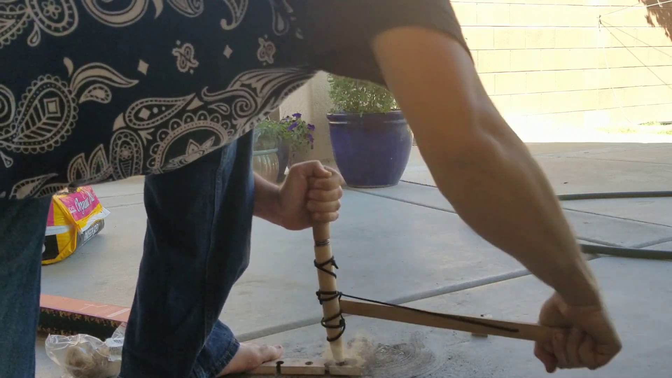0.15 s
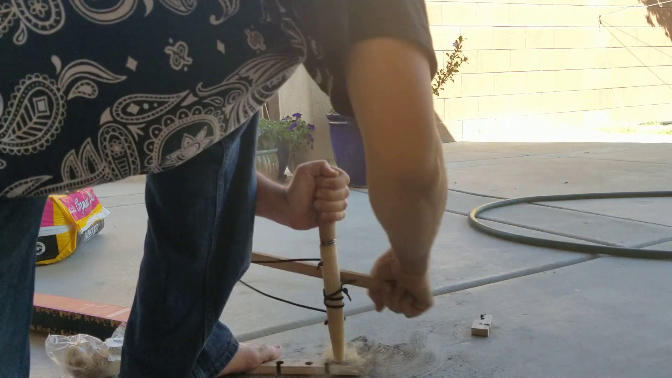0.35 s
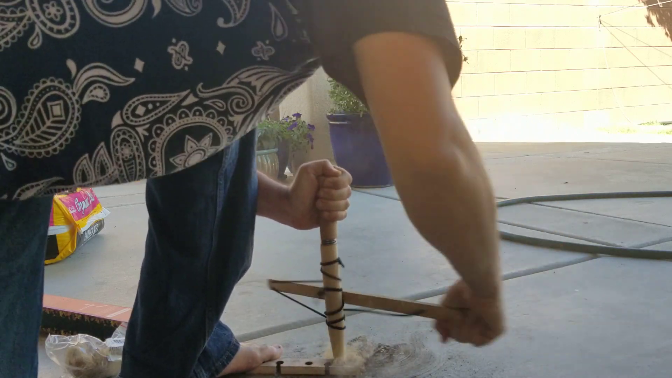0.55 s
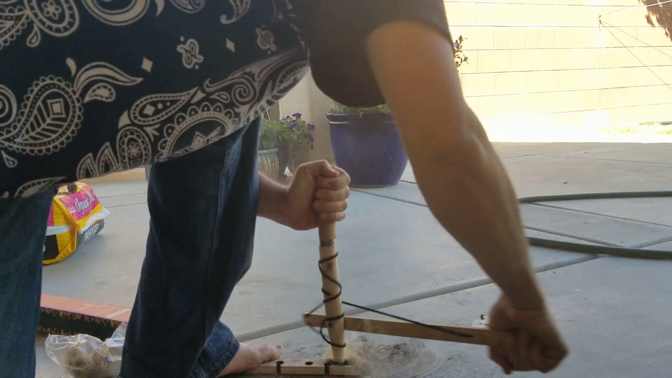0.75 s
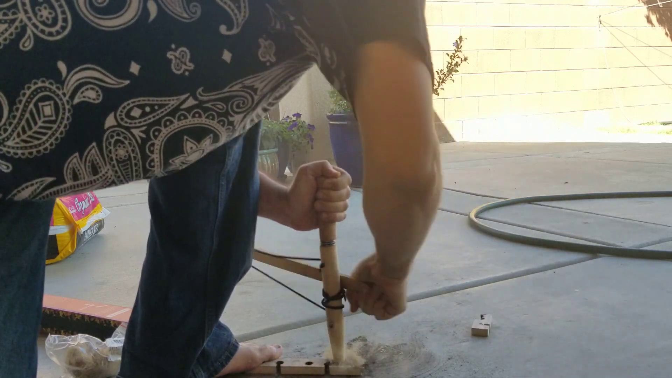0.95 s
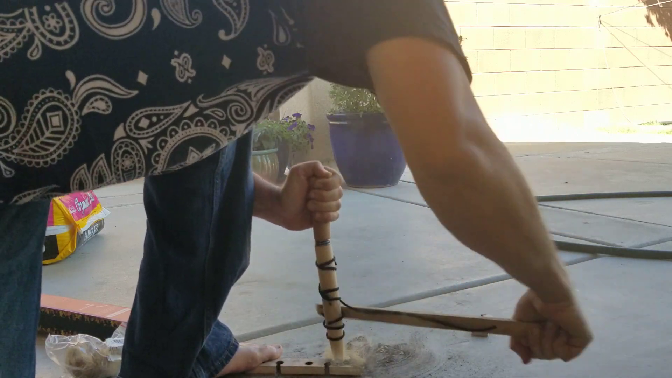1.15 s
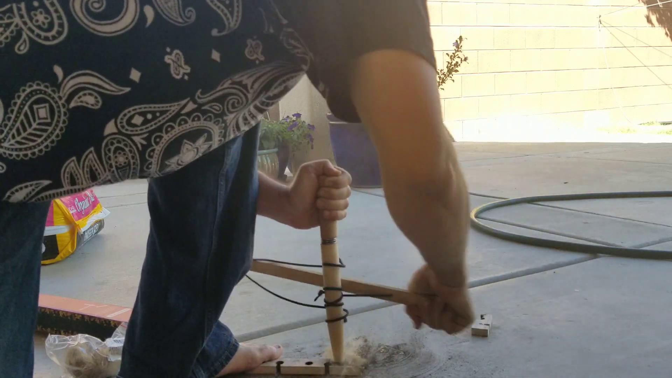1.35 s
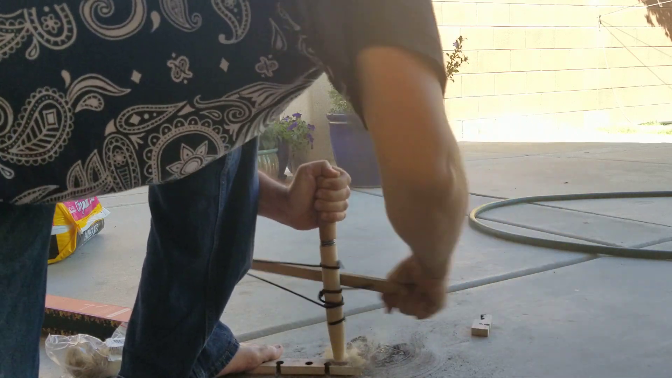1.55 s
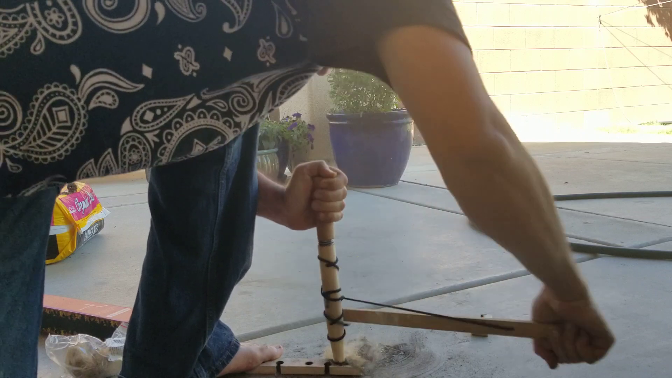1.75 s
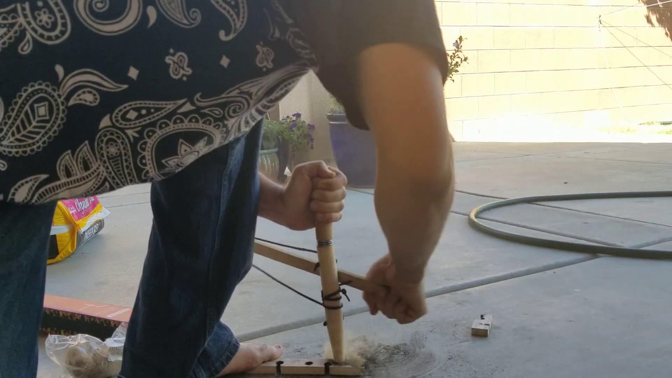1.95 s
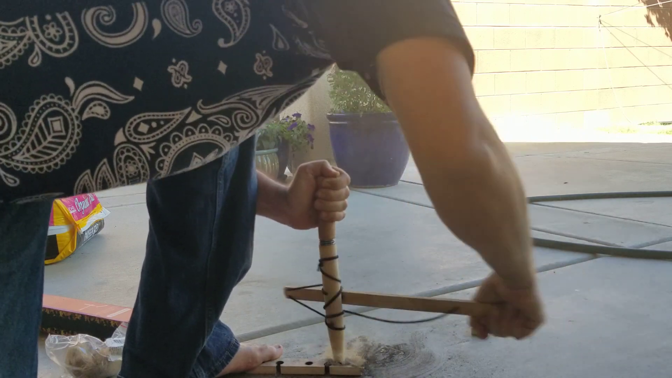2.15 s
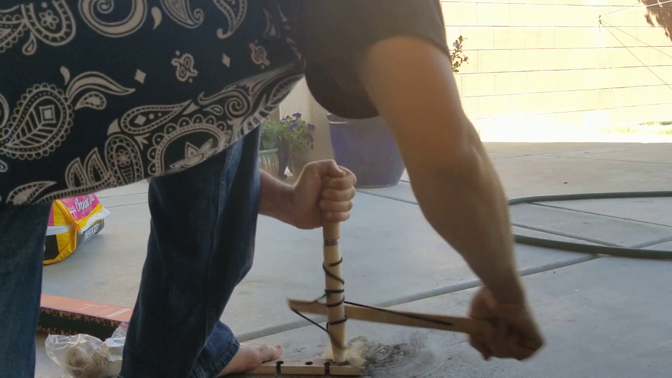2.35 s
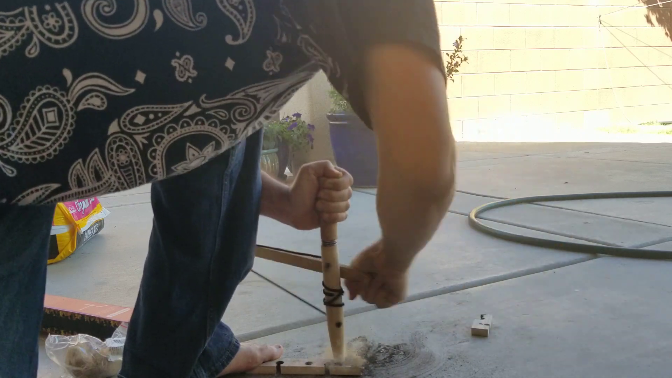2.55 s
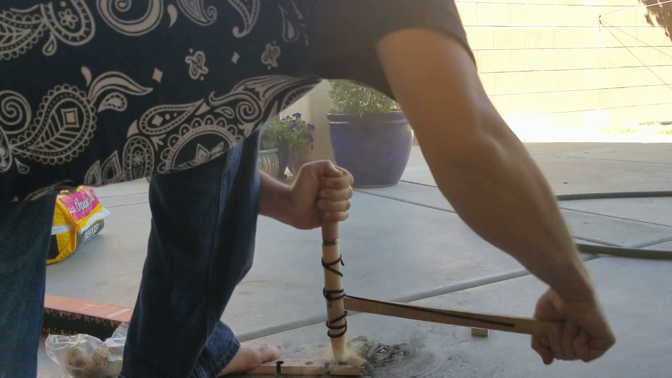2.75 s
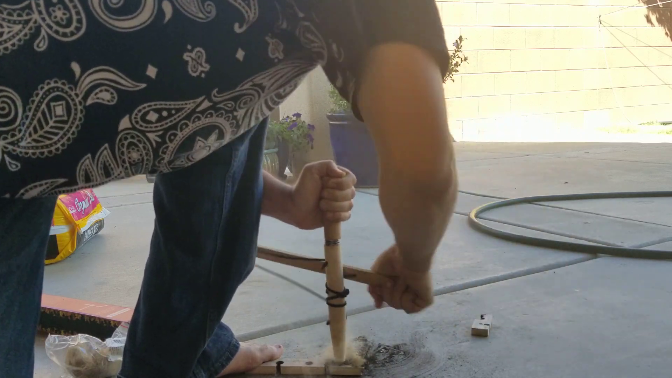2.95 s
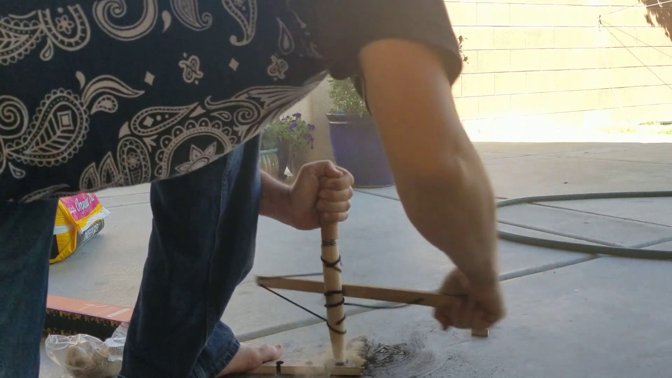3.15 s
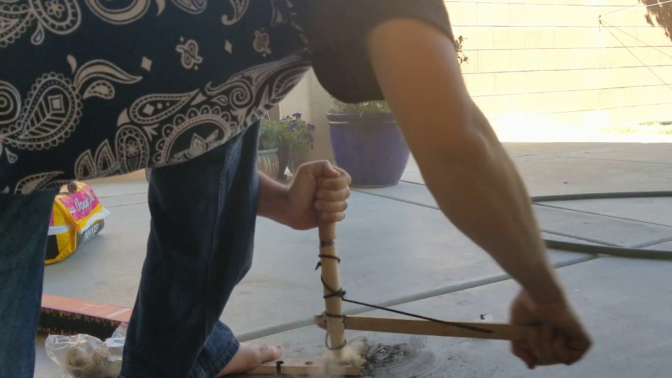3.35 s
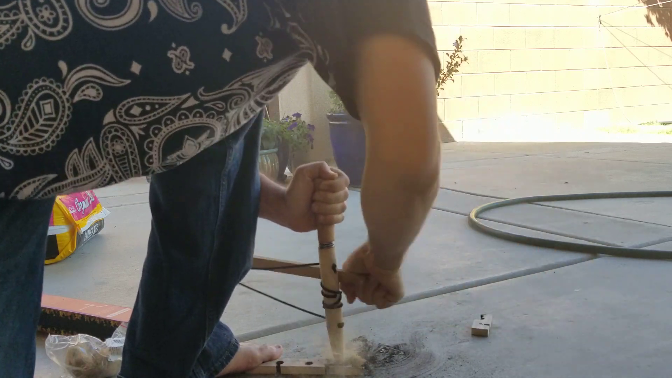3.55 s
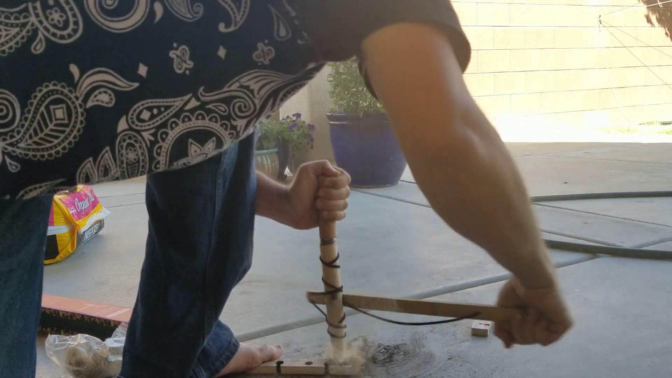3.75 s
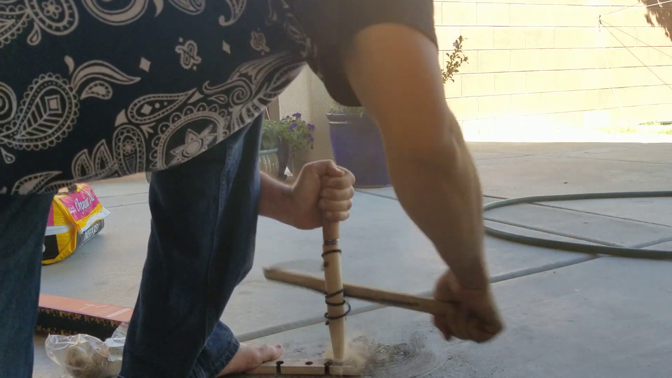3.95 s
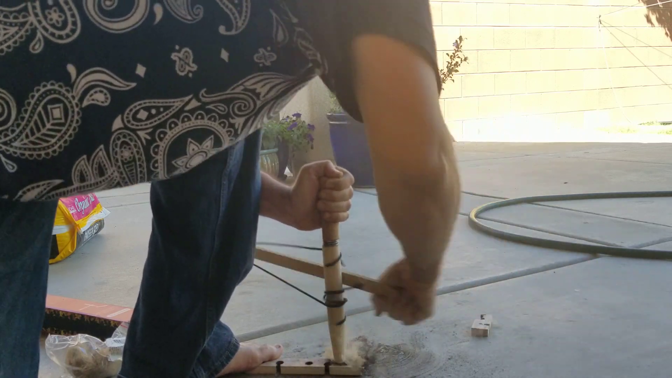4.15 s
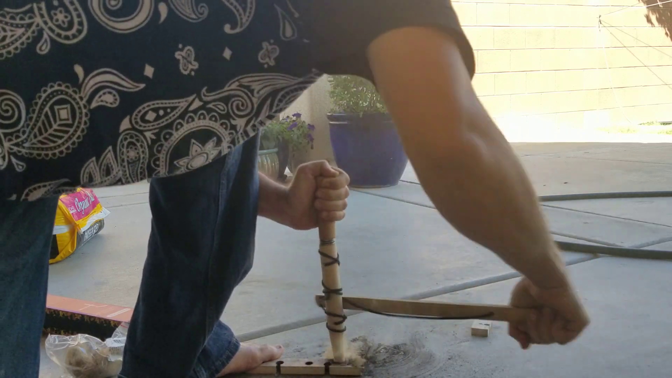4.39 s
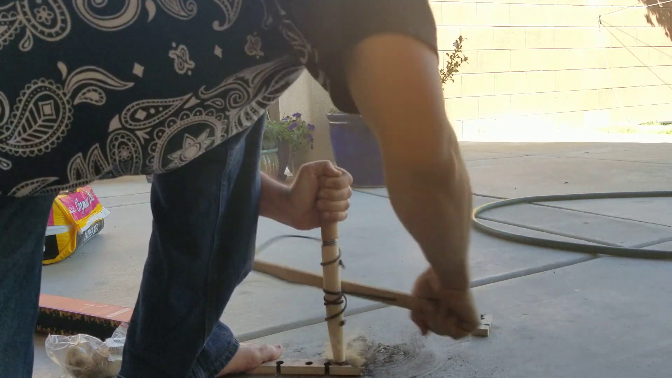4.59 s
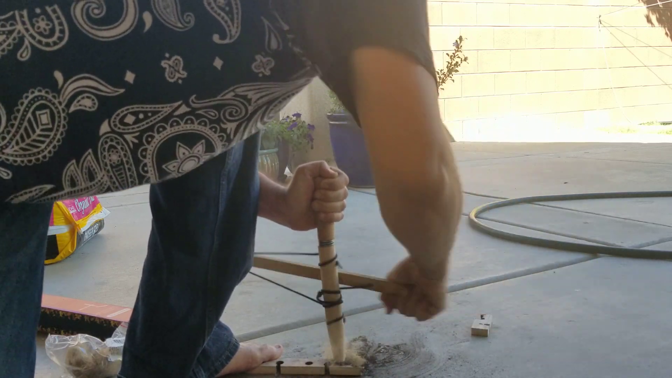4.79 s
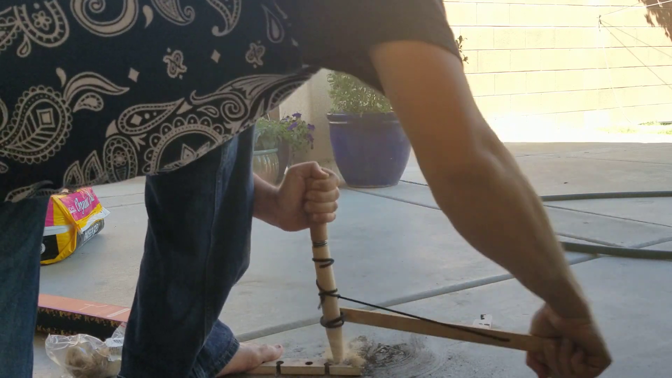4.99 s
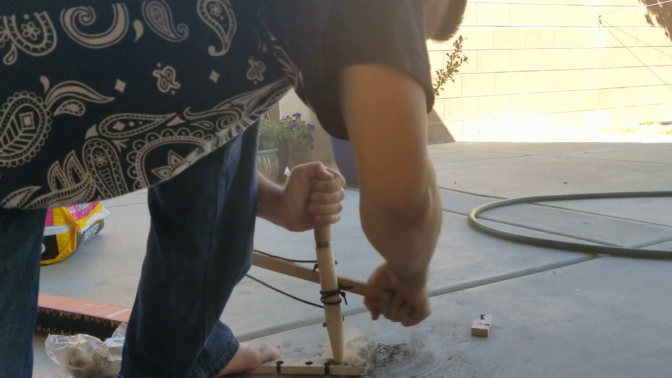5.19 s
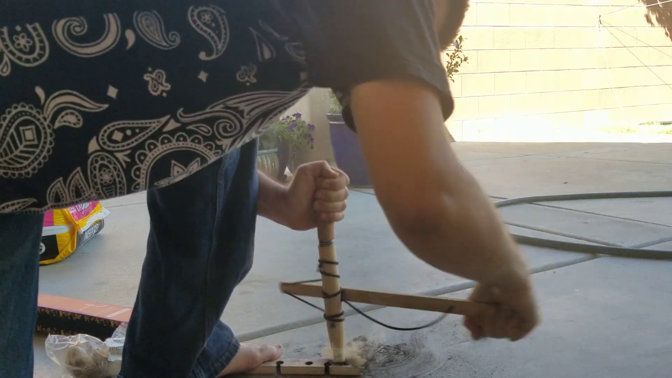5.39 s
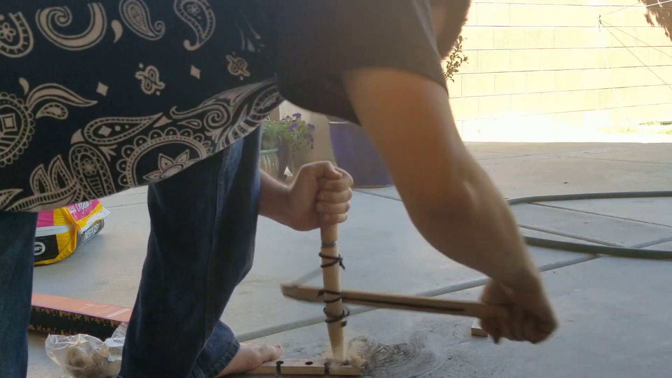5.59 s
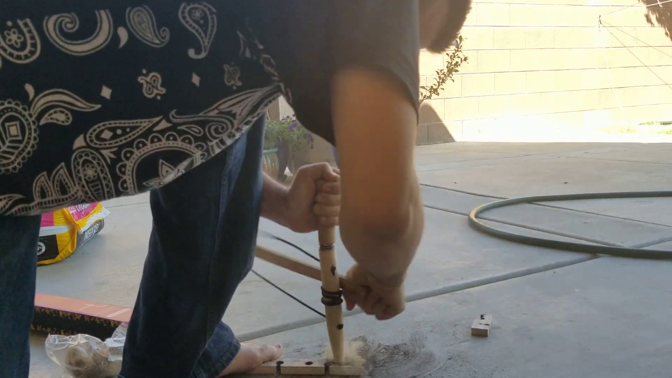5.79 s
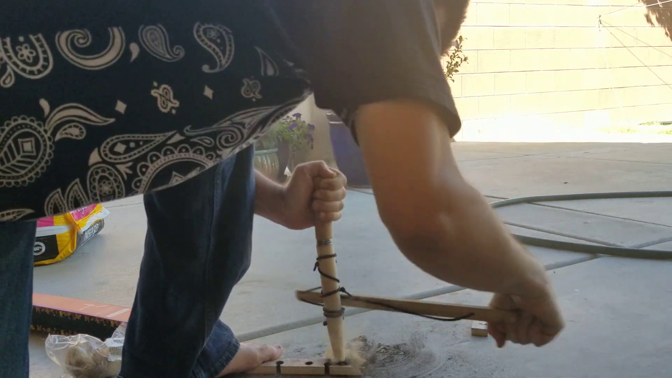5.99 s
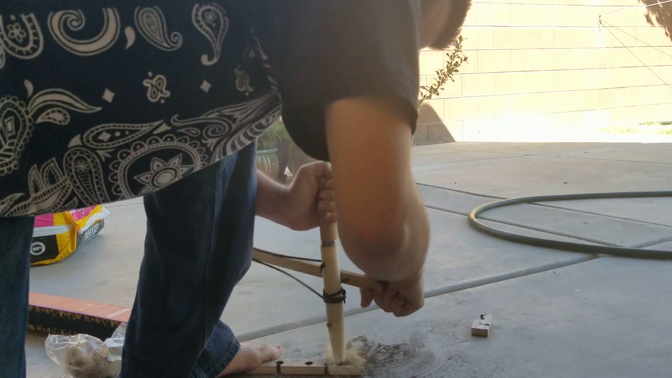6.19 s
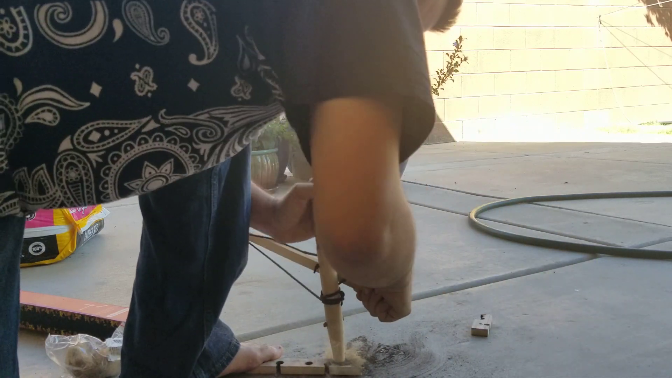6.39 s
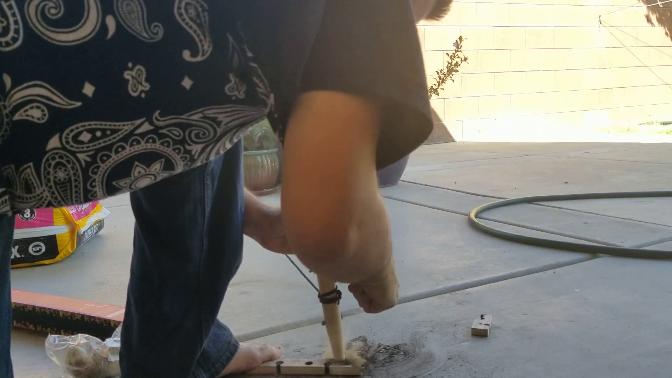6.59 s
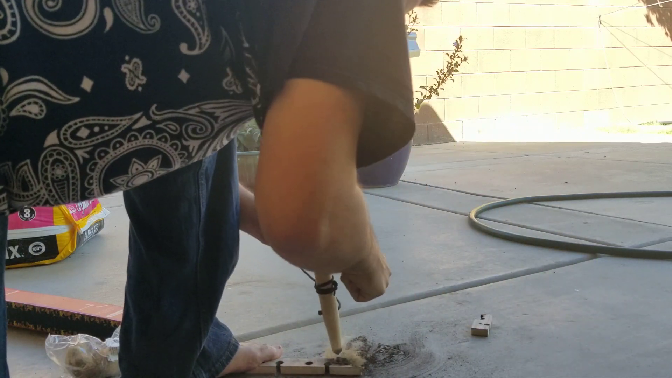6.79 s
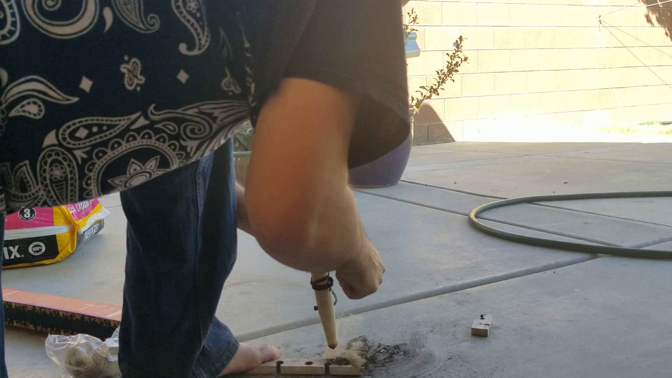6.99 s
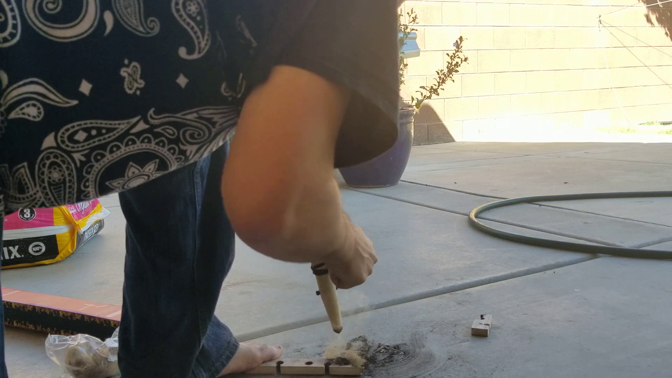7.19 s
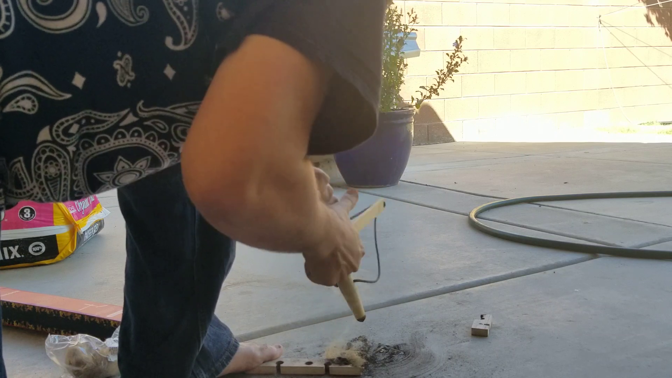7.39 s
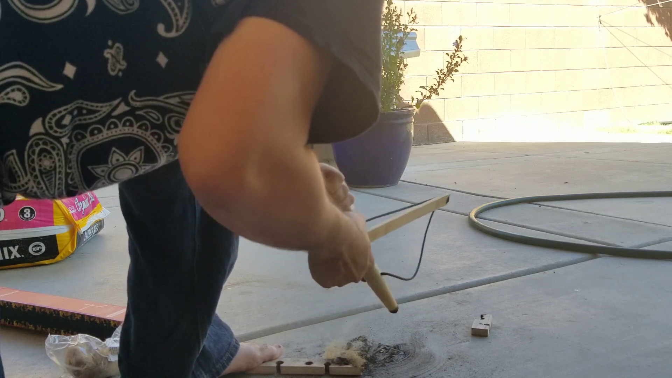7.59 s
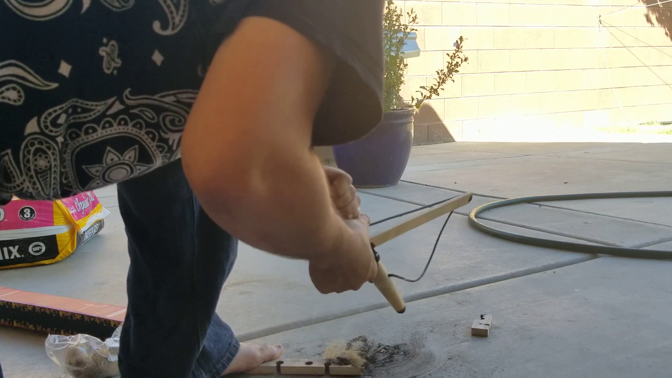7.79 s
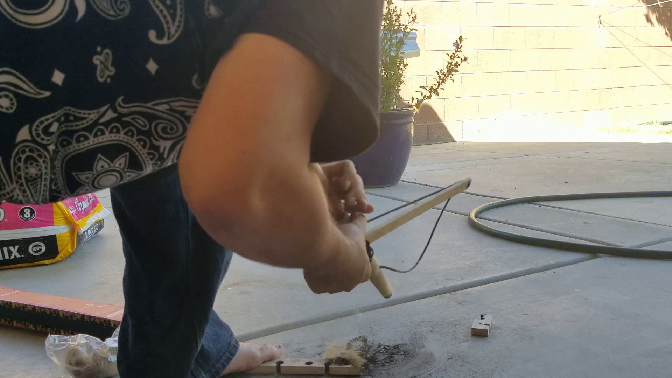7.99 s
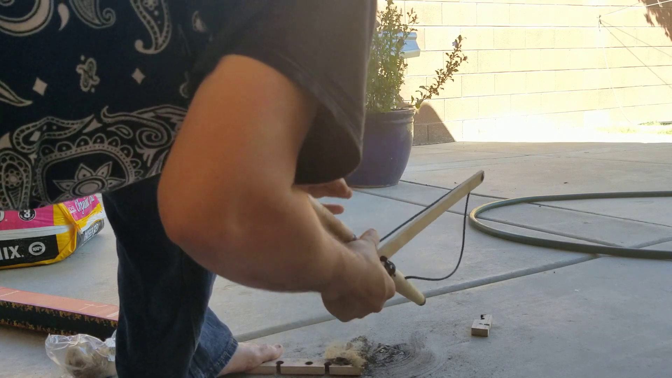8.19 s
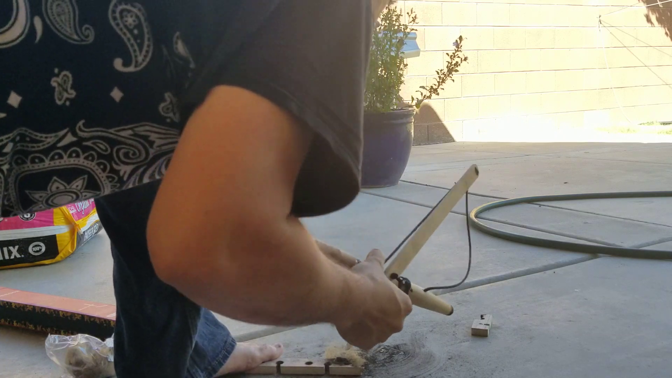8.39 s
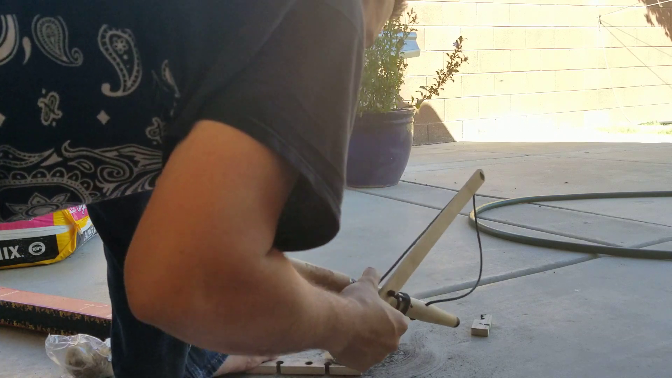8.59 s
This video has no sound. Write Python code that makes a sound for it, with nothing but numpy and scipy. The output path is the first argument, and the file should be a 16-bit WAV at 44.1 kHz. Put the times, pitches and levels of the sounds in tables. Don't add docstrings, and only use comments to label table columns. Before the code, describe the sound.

Fast rasping strokes of a wooden spindle on a board, with snapping cord and knocking bow, stop; then quiet patio, soft coo and falling bird whistles.

```python
import sys
import numpy as np
from scipy import signal
from scipy.fft import rfft, irfft, next_fast_len
from scipy.io import wavfile
from scipy.ndimage import uniform_filter1d

SR = 44100
rng = np.random.default_rng(int(sys.argv[2]) if len(sys.argv) > 2 else 0)


def boost(x):
    u = np.asarray(x, float) / 20
    return 10 ** u


def transcribe(u):
    v = np.clip(np.atleast_2d(u).T, -1, 1)
    q = np.round(v * 32767).astype(np.int16)
    wavfile.write(sys.argv[1], SR, q)


N = 381024


def level(x, db):
    return x * boost(db) / np.sqrt(np.mean(x ** 2))


def curves(table, outside):
    s, *columns = np.transpose(table)
    return [np.interp(np.arange(N) / SR, s, c, outside, outside) for c in columns]


def band(x, lo_hz, hi_hz, order=3):
    return signal.sosfilt(signal.butter(order, [lo_hz, hi_hz], "bandpass", fs=SR, output="sos"), x)


def response(points, modes=()):
    hz = np.arange(2049) * SR / 4096 + 1
    point_hz, point_db = np.transpose(points)
    db = np.interp(np.log(hz), np.log(point_hz), point_db)
    db = db + sum(mode_db / (1 + (2 * (hz - mode_hz) / width) ** 2) for mode_hz, width, mode_db in modes)
    cep = irfft(np.log(boost(db)))
    cep[1:2048] *= 2
    cep[2049:] = 0
    return irfft(np.exp(rfft(cep)))[:2048]


def walk(rate):
    k = int(SR / rate)
    held = np.repeat(rng.standard_normal(N // k + 1), k)
    return 0.9 * uniform_filter1d(held, k)[:N]


def pair(x, alike):
    side = x * rng.choice([-1, 1], size=N)
    return np.array([x, alike * x + np.sqrt(1 - alike ** 2) * side])


def sides(left_db, right_db):
    return boost(np.array([[left_db], [right_db]]))


# (time of top speed [s], rasp level [dB], speeding up [s], slowing down [s])
PULLS = [(0., -38, 0.073, 0.075), (0.307, -32.5, 0.14, 0.13), (0.626, -34.5, 0.13, 0.15),
         (0.956, -32.5, 0.083, 0.12), (1.266, -35.5, 0.095, 0.14), (1.573, -33, 0.076, 0.19),
         (1.927, -31, 0.11, 0.091), (2.227, -28, 0.095, 0.15), (2.555, -29.5, 0.13, 0.17),
         (2.881, -28.5, 0.053, .16), (3.205, -31.5, 0.068, 0.17), (3.521, -28, 0.091, 0.15),
         (3.796, -34, 0.011, 0.27), (4.175, -31.5, 0.11, 0.15), (4.494, -30, 0.073, 0.1),
         (4.808, -32, 0.15, 0.14), (5.153, -33, 0.16, 0.16), (5.454, -29.5, 0.055, 0.17),
         (5.758, -30, 0.055, 0.16), (6.055, -33.5, 0.036, 0.25)]
# (time of top speed [s], rasp level [dB], slowing down [s])
PUSHES = [(0.137, -37.5, 0.13), (0.456, -39.5, 0.21), (0.796, -38.5, 0.19), (1.112, -39.5, 0.47),
          (1.437, -38, 0.1), (1.752, -38, 0.18), (2.066, -38, 0.16), (2.394, -36.5, 0.15),
          (2.709, -37, 0.22), (2.8, -39.5, 0.28), (3.046, -38, 0.14), (3.367, -35.5, 0.12),
          (3.687, -36, 0.15), (4.012, -34.5, 0.13), (4.33, -37, 0.41), (4.653, -37.5, 0.12),
          (4.985, -36, 0.13), (5.299, -39, 0.19), (5.624, -37.5, 0.16), (5.92, -38.5, 0.18),
          (6.28, -55, 0.16)]
PULL_KNOCKS = [-13, -12, -10.5, -12, -10, -13.5, -14, -14.5, -14.5, -15, -10.5, -14.5, -17.5, -12, -12,
               -13.5, -13, -12.5, -11, -11]
PUSH_KNOCKS = [-13.5, -12.5, -11.5, -13, -11.5, -11.5, -10.5, -11, -11.5, -13.5, -13, -12, -12.5, -13, -15,
               -11.5, -12, -14.5, -14, -13.5, -7.5]


def strokes():
    pull_dust_db, push_dust_db, push_rise_s = -5.5, -7, 0.14
    settling_db_per_s = -0.25
    rows = [(s, db, rise, fall, knock, pull_dust_db)
            for (s, db, rise, fall), knock in zip(PULLS, PULL_KNOCKS)]
    rows += [(s, db, push_rise_s, fall, knock, push_dust_db)
             for (s, db, fall), knock in zip(PUSHES, PUSH_KNOCKS)]
    return [(*row[:5], row[5] + settling_db_per_s * (row[0] - 3)) for row in rows]


def returning():
    turns = [(row[0], 0) for row in PULLS] + [(row[0], 1) for row in PUSHES]
    s, back = np.transpose(sorted(turns))
    return np.interp(np.arange(N) / SR, s, back) ** 2


def grains(spread_db, share):
    tall_db = np.minimum(spread_db * rng.exponential(size=N), 17)
    spikes = rng.standard_normal(N)
    tall = rng.random(N) < share
    return level(spikes * boost(tall_db * tall), 0)


# (time of release [s], change of level [dB], slowing [s])
STALLS = [(.543, -9, 0.06), (.87, -8.5, 0.046), (1.2, -5.5, 0.039), (1.523, -0.5, 0.05), (2.16, -2, 0.034),
          (2.478, -6.5, 0.028), (2.808, -11, 0.026), (3.01, -1.5, 0.033), (3.33, -3.5, 0.047),
          (3.78, -1.5, .04), (4.412, -9.5, 0.026), (4.745, -7.5, 0.034), (5.079, -4, 0.026),
          (5.4, 0.5, 0.023), (5.707, 1.5, .02), (6.022, 0.5, 0.022)]


def grinding():
    t, power = np.arange(N) / SR, np.zeros((4, N))
    for s, db, rise, fall, knock, dust in strokes():
        span = slice(max(int((s - rise) * SR), 0), int((s + fall) * SR))
        speed = np.interp(t[span], [s - rise, s, s + fall], [0, 1, 0])
        makeup = [(knock, 1.9), (-3.2, 2.1), (1.08 * dust - 1.5, 2.2), (dust, 2.3)]
        for k, (rel_db, steep) in enumerate(makeup):
            power[k, span] += (boost(db + rel_db) * speed ** steep) ** 2
    for s, db, slowing in STALLS:
        stall_db = np.interp(t, [s - slowing, s - slowing / 2, s, s + .001], [0, db, db, 0])
        power *= boost(2 * stall_db)

    coarse, fine = grains(4.6, .04), grains(4.2, 0.07)
    tear = [0.59 * coarse + .8 * fine, coarse, 0.74 * coarse + 0.8 * fine, fine]
    flutter_db = 1.9 * walk(70) + 2.9 * walk(220)
    alike, lean_db = [.88, 0.47, 0.29, 0.031], [4.8, 1.4, 11.7, 3.8]
    rubs = []
    for grain, drive, same, lean in zip(tear, power, alike, lean_db):
        rub = pair(grain, same) * np.sqrt(drive)
        wobble_db = flutter_db + 1.67 * walk(45) + 1.56 * walk(16)
        rubs.append(rub * boost(wobble_db) * sides(lean / 2, -lean / 2))
    return rubs


# (time [s], tick level [dB], crack against the tick [dB])
TICKS = [(0.1588, -35.5, -4), (0.2912, -26, -4.5), (0.435, -24.5, -7.5), (0.612, -26, -4),
         (0.7586, -20.5, -8.5), (0.9535, -25, -4.5), (1.095, -26.5, -6), (1.408, -22.5, -5),
         (1.584, -25.5, -9), (1.7396, -35, -15), (1.8744, -30, -4), (1.9157, -22, -5), (2.042, -23, -6),
         (2.048, -26.5, -6), (2.3743, -22.5, -3.5), (2.4863, -31.5, -17), (2.532, -31.5, -10),
         (3.039, -36.5, -8), (3.1846, -22, -14), (3.359, -30.5, -6.5), (3.488, -28.5, -7),
         (3.528, -25, -20), (3.821, -27, -8.5), (4.135, -28.5, -5.5), (4.4237, -32.5, -7.5),
         (4.456, -34.5, -3.5), (4.7485, -30.5, -11), (5.429, -41, -2), (5.4376, -30, 0),
         (5.6327, -27, -1.5)]
# (time [s], body level [dB], crack against body [dB], knock against body [dB])
BLOWS = [(.31, -36.5, 3, -3), (.544, -43, 0, -20), (0.6301, -33.5, -0.5, -8.5), (0.7934, -29, 8.5, -16.5),
         (0.937, -33.5, 1.5, -7.5), (0.9707, -34.5, 2, -7.5), (1.525, -26, -2, -24),
         (1.5405, -39, -19.5, -28), (1.573, -46.5, -0.5, -11), (1.9295, -31, 5, -10),
         (2.1641, -35, 1.5, -27), (2.2114, -29.5, 0, -11.5), (2.5398, -31.5, -0.5, -11.5),
         (2.699, -43.5, -3.5, -20), (2.7659, -38, -3, -14.5), (2.867, -25, 1, -15), (3.195, -31, -2.5, -13),
         (3.5128, -31, 7, -12), (3.781, -24, -1, -24), (3.798, -38.5, -12, -20.5),
         (3.828, -27.5, 3.5, -13.5), (3.8467, -29.5, 1.5, -14), (4.157, -30, -13, -9.5),
         (4.4725, -31, -2, -10), (4.489, -39, 8, -22), (4.7914, -28.5, 0, -11.5),
         (5.1344, -26.5, -1, -10.5), (5.445, -22, 3, -15), (5.7517, -25.5, 0.5, -17.5),
         (6.037, -31, -9.5, -13)]
# (time [s], crack level [dB], tick against the crack [dB])
SPLINTERS = [(0.1056, -46, 5.5), (0.2735, -41, 1.5), (0.904, -38.5, 5), (1.204, -36, -1),
             (1.2639, -29.5, 1.5), (1.8983, -32.5, 1), (2.0838, -36.5, -14), (2.4795, -38.5, 3),
             (2.544, -44, -14.5), (2.7072, -34.5, 2), (2.8174, -37.5, 4), (2.8745, -40, 2),
             (2.9278, -37, -2), (3.165, -36.5, -2.5), (3.21, -26.5, -2.5), (3.4518, -40.5, 0),
             (3.671, -37, 0.5), (3.676, -36, 1), (4.004, -37.5, 2), (4.0974, -40.5, 1), (4.352, -32, -3.5),
             (4.636, -34.5, -1.5), (4.694, -41, 5), (4.967, -37, -5), (5.284, -40, -1), (5.403, -34.5, -2),
             (5.455, -36, 4.5), (5.7083, -37.5, 0), (5.736, -40, 0.5), (6.0774, -33, -4.5)]
# (time [s], peak level [dB], tick against peak [dB],
# body against peak [dB])
CHIPS = [(0.081, -49, 3, -5), (0.143, -39.5, 3.5, -6), (0.216, -46.5, 4.5, 1), (0.284, -39.5, -4.5, -7),
         (0.552, -40, 6, -5), (0.564, -40, 1.5, -1.5), (0.602, -35.5, -1, -3), (0.708, -45, -1.5, -4.5),
         (0.739, -50, -6.5, 6), (0.8702, -43.5, 4, 3), (0.882, -38.5, 4, -3), (0.896, -44, 0, 4),
         (0.915, -38, 6, -12), (1.089, -41, 4, -9), (1.2443, -33, -0.5, -6), (1.3, -36, -10, -1),
         (1.4462, -37, -2.5, -0.5), (1.602, -31.5, -3, -2.5), (1.645, -39, 1.5, -7),
         (1.8459, -39.5, 1.5, -2), (2.2285, -30, 0.5, -6.5), (2.676, -50, -1, -4), (2.7469, -36.5, 1.5, -4),
         (2.8084, -50, 4, 4), (3.2228, -27, -9, 0), (3.3066, -41, -2.5, -1), (3.3877, -36, 1, -5.5),
         (3.4986, -35, -2, 0), (3.642, -41.5, -2, -2), (3.8114, -38, 3.5, -10), (3.8619, -34, 4.5, 4.5),
         (3.9906, -37.5, -2, -9), (4.0262, -38.5, -7, -14.5), (4.1255, -40.5, 5, 4), (4.19, -33, -1, 3.5),
         (4.2717, -42, -5, -1), (4.321, -37.5, 4.5, -7), (4.4134, -42, -0.5, -1),
         (4.6731, -33.5, -4.5, -7.5), (4.8364, -32, -1, 0), (4.987, -35.5, 0, -8), (5.0826, -44.5, 6, 2.5),
         (5.1437, -32, -6, -15), (5.3306, -36.5, -6, -6.5), (5.4114, -40.5, -5, -5), (5.493, -36, -6, 3),
         (5.594, -39.5, 1, -2), (5.6002, -38.5, 0, -1),
         (5.723, -37, 3.5, -1),
    (5.78, -30.5, 2, -1),
    (5.8077, -37.5, -4.5, 3.5),
    (5.861, -39.5, -2, -1),
    (5.911, -40, 2.5, -9),
    (6.024, -51, 3, 3),
    (6.0654, -38, -4.5, 1.5),
    (6.1121, -33, -2.5, -3),
    (6.1324, -42, 0, -8),
]


def snap_rows():
    rows = [(s, db - 33, db - 26.5, db + crack, db, 7.5, 1) for s, db, crack in TICKS]
    rows += [(s, db + knock, db, db + crack, db + crack - 6, 4, 1) for s, db, crack, knock in BLOWS]
    rows += [(s, db - 19, db - 10, db, db + tick, 6, 1.8) for s, db, tick in SPLINTERS]
    rows += [(s, db - 21, db + body - 4.5, db - 3, db + tick - 2, 4, 2.18)
             for s, db, tick, body in CHIPS]
    return rows


# (swell [ms], fade [ms], blow level [dB], rattle level [dB], settling level [dB], gain [dB])
SNAP_SHAPE = [(.1, 0.73, 5.5, -19.5, -23.5, 27.5), (.1, 0.6, 16.5, -13, -16, 25.5),
              (.3, 0.5, 8.5, -14.5, -25.5, 23), (0.45, 0.28, 2, -24, -37, 24)]


def snaps():
    out = np.zeros((4, 2, N + 4096))
    ms = np.arange(4096) * 1000 / SR
    blow = np.arange(len(ms)) == np.array([[8], [6]])
    for s, *band_db, pan, soft in snap_rows():
        i = int(s * SR)
        noise = rng.standard_normal((2, len(ms)))
        for k, (db, shape) in enumerate(zip(band_db, SNAP_SHAPE)):
            swell, fade, blow_db, rattle_db, settle_db, gain_db = shape
            crack = np.exp(-ms / (fade * soft))
            rattle = boost(rattle_db) * np.exp(-ms / 6.0)
            settling = boost(settle_db) * np.exp(-ms / 35)
            rise = np.minimum(ms / (swell * soft ** 2), 1)
            wave = noise if k else noise[:1]
            burst = wave * rise * (crack + rattle + settling)
            burst = burst + boost(blow_db - 8 * (soft - 1)) * blow
            burst = burst / np.sqrt(np.sum(burst[:, :128] ** 2, axis=1, keepdims=True))
            out[k, :, i:i + len(ms)] += burst * sides(pan / 2, -pan / 2) * boost(db + gain_db)
    return out[:, :, :N]


# (time [s], peak level [dB], pitch [Hz])
RINGS = [(0.3084, -40, 1650), (0.5437, -43.5, 1710), (0.628, -39, 1800), (0.7953, -24.5, 1674),
         (0.937, -32, 1494), (1.07, -45, 1590), (1.1987, -48.5, 1660), (1.5247, -25, 1750),
         (1.5404, -29, 1570), (1.5723, -33, 1480), (1.9288, -31, 1590), (2.048, -35.5, 1760),
         (2.1655, -38, 1520), (2.181, -36, 1580), (2.213, -32, 1610), (2.4783, -36, 1740),
         (2.7683, -35, 1780), (2.866, -28, 1610), (3.193, -38, 1620), (3.2086, -32, 1580),
         (3.248, -33, 1570), (3.452, -40, 1620), (3.5129, -31, 1520), (3.678, -36.5, 1590),
         (3.7823, -28, 1574), (3.798, -37, 1630), (3.8282, -28.5, 1770), (3.8437, -28, 1530),
         (3.881, -32, 1530), (3.9649, -39, 1610), (4.1565, -33.5, 1610), (4.474, -30, 1620),
         (4.6086, -39, 1590), (4.7395, -42, 1590), (4.79, -45, 1620), (5.133, -35, 1630),
         (5.444, -32, 1460), (5.497, -28, 1560), (5.709, -43.5, 1620), (5.75, -27, 1570),
         (5.804, -33, 1530), (5.8795, -37, 1560), (5.9324, -43, 1730), (6.039, -26, 1640),
         (6.0826, -25, 1520), (6.1394, -36, 1560)]


def bow_ring():
    t60_s, swell_s = 0.051, 0.0012
    partner_ratio, partner_db = .93, -7
    t, out = np.arange(4096) / SR, np.zeros((2, N))
    fade = np.exp(-np.log(1000) * t / t60_s) * np.minimum(t / swell_s, 1)
    for s, db, hz in RINGS:
        turn = 2 * np.pi * hz * t + np.array([[0], [1.2]])
        ring = fade * (np.sin(turn) + boost(partner_db) * np.sin(partner_ratio * turn))
        out[:, int(s * SR):int(s * SR) + len(t)] += ring * boost(db - 3.5)
    return out * np.array([[1.3], [.8]])


# (low edge [Hz], high edge [Hz])
BANDS = [(150, 900), (900, 4500), (4500, 9000), (9000, 18000)]
BOW_LOW = [178, 1250, 5340, 10670]
RETURN_BOW_SHARE = [.05, .55, .2, .1]
# (pitch [Hz], level per Hz [dB])
WOOD = [(88, -34), (150, -6), (268, -2), (380, -11), (445, -3.5), (643, -7), (1400, -7), (1570, -5.5),
        (2230, -5.5), (2760, -2), (3350, -5.5), (7000, 3), (8830, -9), (11800, -1), (15500, -3)]
# (pitch [Hz], width [Hz], level [dB])
BOARD = [(306, 48, 4), (452, 40, 7), (499, 23, 5), (565, 50, 6), (1590, 91, 5), (1912, 410, 3),
         (2755, 270, -4), (6370, 620, -7)]
# (pitch [Hz], width [Hz], level [dB])
BOW = [(1620, 160, 4), (1950, 250, 2), (2750, 490, 1)]


def drill():
    press_shift, press_rate_hz = 0.038, 7
    press = (1 + np.tanh(1.5 * walk(press_rate_hz))) / 2
    slack, tight = (response(WOOD, [(hz * (1 + way * press_shift), w, db) for hz, w, db in BOARD])
                    for way in (-1, 1))
    bow, back, spectrum = response(WOOD, BOW), returning(), 0
    for (lo, hi), bow_lo, share, rub, snap in zip(BANDS, BOW_LOW, RETURN_BOW_SHARE, grinding(), snaps()):
        through_bow = share * back
        snap, rub = snap + through_bow * rub, (1 - through_bow) * rub
        x = np.array([rub * (1 - press), rub * press, snap])
        h = np.array([band(slack, lo, hi), band(tight, lo, hi), band(bow, bow_lo, hi)])
        h = h / np.sqrt(np.sum(h ** 2, axis=1, keepdims=True))
        size = next_fast_len(N + h.shape[1])
        spectrum = spectrum + np.sum(rfft(x, size) * rfft(h, size)[:, None], axis=0)
    left, right = irfft(spectrum, size)[:, :N] + bow_ring()
    return np.array([np.roll(left, -3), right])


# (time [s], low edge [Hz], high edge [Hz], level [dB], decay [s])
SCUFFS = [
    (6.32, 1000, 9000, -60, .042),
    (8.47, 4700, 5400, -73, .1),
    (8.2, 3800, 4600, -76, .08),
    (7.452, 4300, 5700, -61, .035),
    (7.45, 6100, 7100, -65, .02),
    (7.5, 1900, 2240, -68, .05),
    (8.086, 1180, 1500, -53, .014),
    (8.088, 1170, 2900, -66, .045),
]
# (time [s], low edge [Hz], high edge [Hz], level [dB], decay [s])
SLACK = [
    (6.783, 2200, 16000, -45, .0009),
    (6.79, 4000, 8000, -72, .03),
    (6.869, 5000, 14000, -61, .001),
    (6.897, 4500, 12000, -59, .001),
    (6.921, 4000, 16000, -53, .001),
]


def scuffs():
    t, out = np.arange(SR // 4) / SR, np.zeros((2, N + SR))
    for s, lo, hi, db, decay in SCUFFS + SLACK:
        brush = level(band(rng.standard_normal((2, len(t))), lo, hi), db) * np.exp(-t / decay)
        out[:, int(s * SR):int(s * SR) + len(t)] += brush
    return out[:, :N] * sides(3., -4.)


def patio(x, t60_s, wet_db):
    t = np.arange(int(.5 * SR)) / SR
    noise = rng.standard_normal((3, len(t)))
    noise = noise[0] + band(noise[1:] - noise[0], 480, 16000, order=2)
    tail = noise * np.exp(-np.log(1000) * t / t60_s) * np.minimum(t / 0.026, 1)
    tail = boost(wet_db) * tail / np.sqrt(np.sum(tail ** 2, axis=1, keepdims=True))
    return x + signal.fftconvolve(x, tail, axes=1)[:, :N]


# (time [s], pitch [Hz], level [dB])
BIRD_NOTES = [
    [(3.21, 3410, -61), (3.38, 3420, -60), (3.5, 3440, -56)],
    [(6.13, 3420, -70), (6.15, 3415, -59), (6.2, 3410, -66), (6.24, 3430, -64), (6.36, 3410, -68),
     (6.46, 3390, -86)],
    [(7.46, 5500, -73), (7.5, 5410, -68.5), (7.532, 5300, -54), (7.565, 5240, -59), (7.578, 5290, -47),
     (7.61, 4760, -43), (7.64, 4700, -77)],
    [(7.685, 4300, -80), (7.7, 4230, -55), (7.732, 4130, -72), (7.775, 4140, -54.5), (7.853, 4040, -56.5),
     (7.951, 3760, -59), (8.081, 3536, -63), (8.1, 3550, -81)],
    [(7.77, 7250, -82), (7.8, 7070, -83), (7.845, 6820, -78), (7.855, 6850, -86)],
    [(7.69, 3870, -61), (7.76, 3590, -64), (7.8, 3560, -70), (7.85, 3440, -62), (7.875, 3420, -81)],
]


def bird():
    out = 0
    for note in BIRD_NOTES:
        hz, db = curves(note, None)[0], curves(note, -140)[1]
        gain = uniform_filter1d(boost(db + 3.3 * walk(110) + 0.8 * walk(35)), size=200)
        trembling_hz = hz * (1 + 0.0021 * walk(90))
        out = out + np.sqrt(2) * gain * np.sin(2 * np.pi * np.cumsum(trembling_hz) / SR)
    return out * sides(1.5, -3.5)


# (time [s], pitch [Hz], level [dB])
COO = [
    (6.315, 490, -86),
    (6.34, 503, -72),
    (6.366, 503.4, -63.5),
    (6.52, 505, -74),
    (6.594, 498, -75),
    (6.68, 495, -88),
]


def dove():
    hz, db = curves(COO, None)[0], curves(COO, -140)[1]
    gain = uniform_filter1d(boost(db + 1.2 * walk(25)), size=600)
    return np.sqrt(2) * gain * np.sin(2 * np.pi * np.cumsum(hz) / SR) * sides(1.5, -1.5)


def thump():
    s, db = np.transpose(strokes())[:2]
    db = db + 3 * (s > 5.4)
    hits = np.bincount((s * SR).astype(int), boost(db), N)
    push = uniform_filter1d(hits, size=3500) * 3500
    return level(band(rng.standard_normal(N), 58, 76, order=2), -25.5) * push


# (time [s], level [dB])
TRAFFIC = [
    (0., -57),
    (2.9, -60),
    (3.2, -65),
    (3.45, -59.5),
    (6.5, -58.5),
    (6.71, -64.5),
    (7.31, -59),
    (7.92, -64.5),
    (8.64, -55),
]
# (time [s], level [dB])
DRONE = [
    (0., -66),
    (2.89, -62),
    (3.44, -67.5),
    (5.36, -63),
    (6.23, -65.5),
    (6.55, -59),
    (6.71, -69),
    (7.31, -53),
    (7.92, -65.5),
    (8.64, -60),
]
# (pitch [Hz], level per Hz [dB])
AIR = [(120, -22.5), (200, -13), (300, -16), (450, -17), (1000, -25.5), (1400, -25), (2000, -17.5),
       (2600, -24.5), (3200, -30.5), (4200, -24.5), (7200, -29), (9000, -39.5), (12500, -24.5),
       (15500, -29.5)]
# (time [s], level [dB])
RUSTLE = [
    (8.2, -85),
    (8.276, -78),
    (8.398, -89.5),
    (8.574, -72),
    (8.64, -63.5),
]


def outdoors():
    deep_db, drone_db = curves(TRAFFIC, None)[0], curves(DRONE, None)[0]
    noise = rng.standard_normal((5, N))
    deep = level(band(noise[0], 43, 72, order=2), 0) * boost(deep_db)
    drone = level(band(noise[1], 100.2, 115.7, order=2), 0) * boost(drone_db)
    low = deep + thump() + drone
    low = low + .16 * np.array([[1], [-1]]) * np.roll(low, N // 3)

    air = signal.fftconvolve(pair(noise[2], 0.27), response(AIR)[None], axes=1)[:, :N]
    air = level(air, -68.5)
    air = air + .3 * walk(6) * band(air, 2600, 6500, order=2)

    rustle_db = curves(RUSTLE, -140)[0] + 3.8 * walk(56) + 4.5
    rustle = level(band(noise[3:], 980, 10000, order=1), 0) * boost(rustle_db)
    air = air * boost(.8 * walk(5) + 0.12 * (deep_db + 62.0))
    return low * sides(1.1, -1.1) + (air + rustle) * sides(3., -3.5)


def scene():
    near = patio(drill() + scuffs(), t60_s=0.18, wet_db=-10.5)
    far = patio(bird(), t60_s=0.3, wet_db=-1.5)
    return near + far + dove() + outdoors()


def band_limit(x):
    return signal.sosfilt(signal.butter(12, 16990, fs=SR, output="sos"), x)


def record(dry):
    wide = dry + boost(-8.5) * band(dry - dry[::-1], 620, 1150, order=1)
    top = signal.ellip(6, .3, 22, 15800, fs=SR, output="sos")
    mix = signal.sosfilt(top, np.tanh(wide))
    return band_limit(mix)


dry = scene()
out = record(dry)
transcribe(out)
```